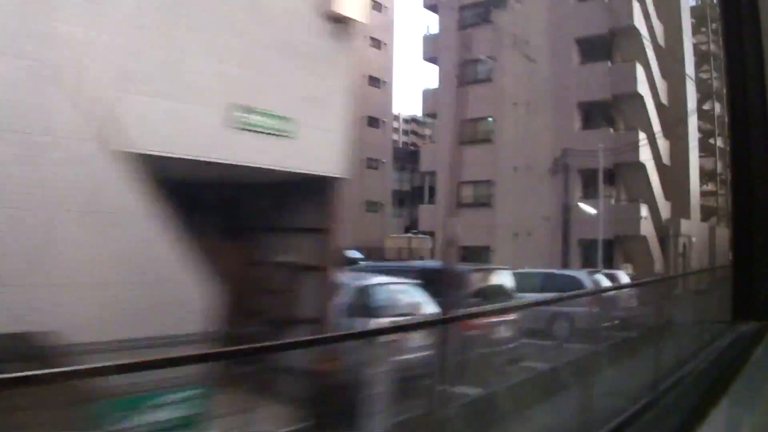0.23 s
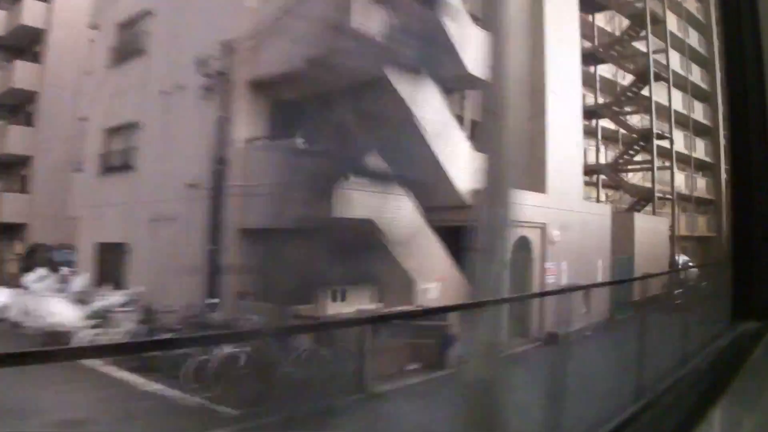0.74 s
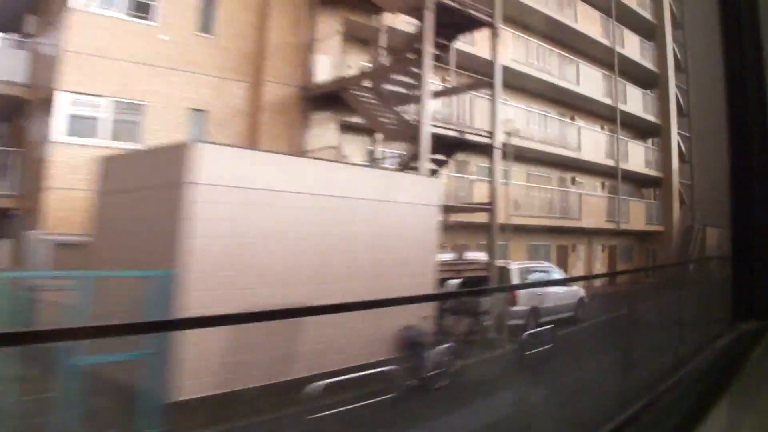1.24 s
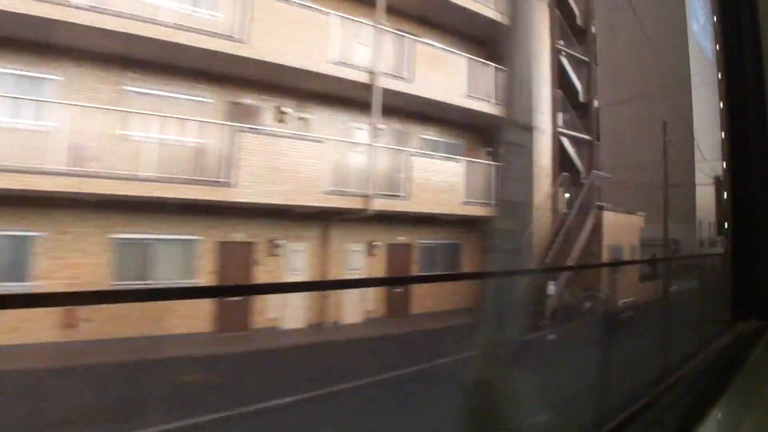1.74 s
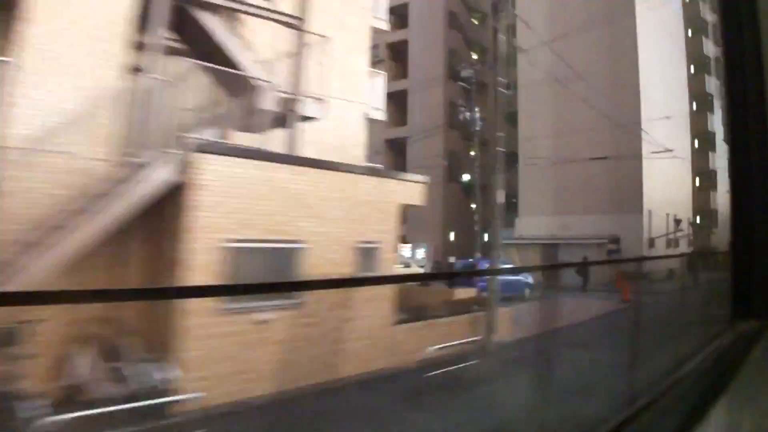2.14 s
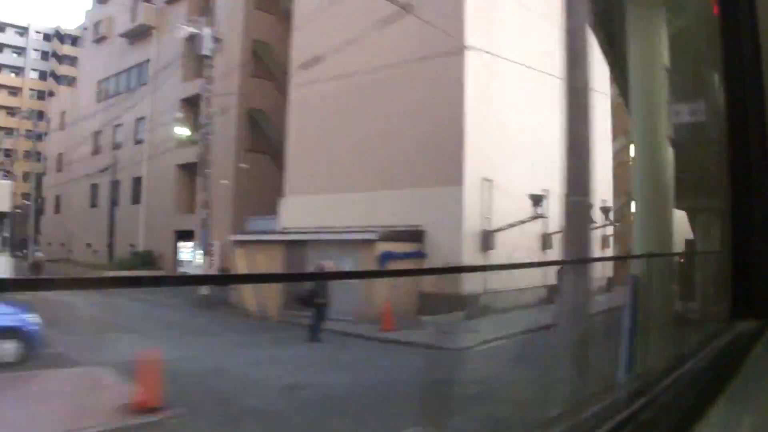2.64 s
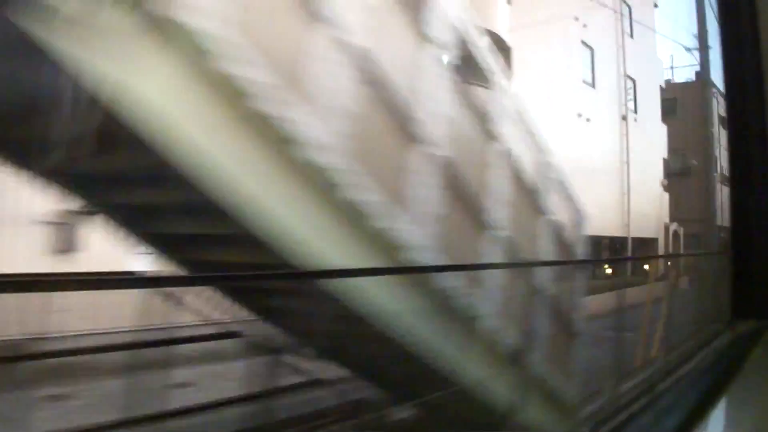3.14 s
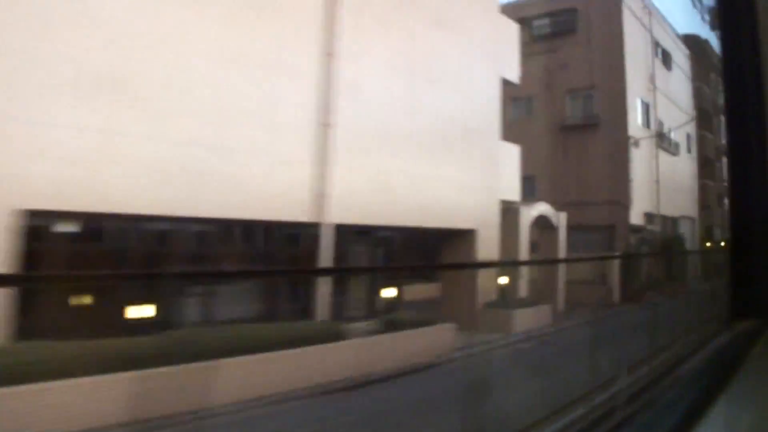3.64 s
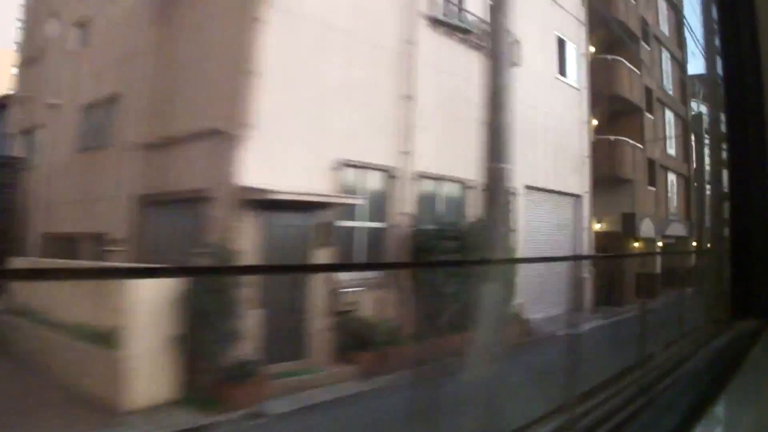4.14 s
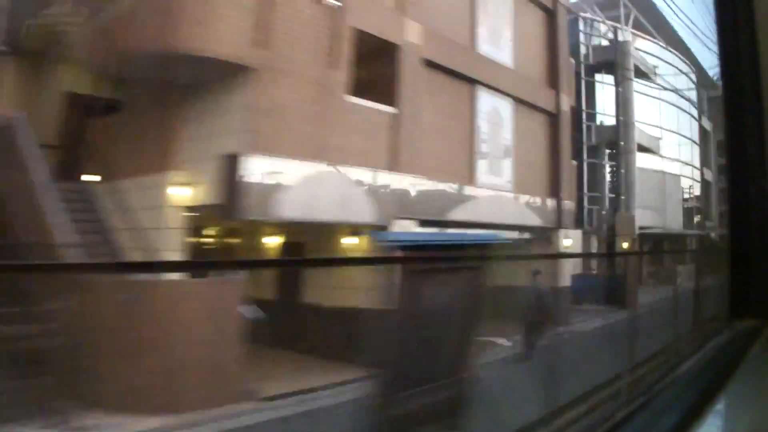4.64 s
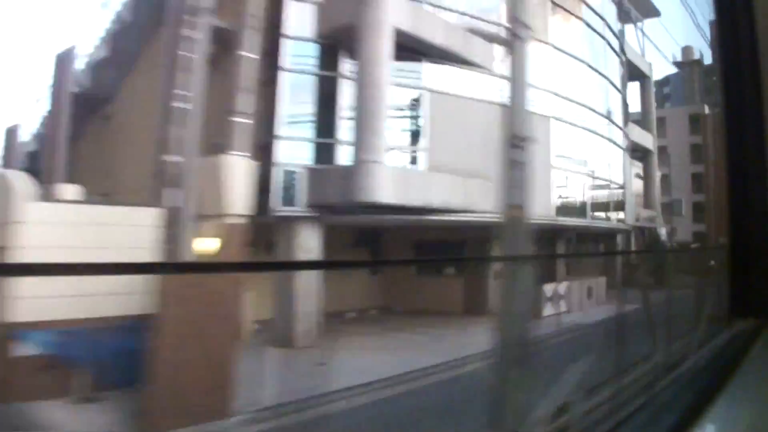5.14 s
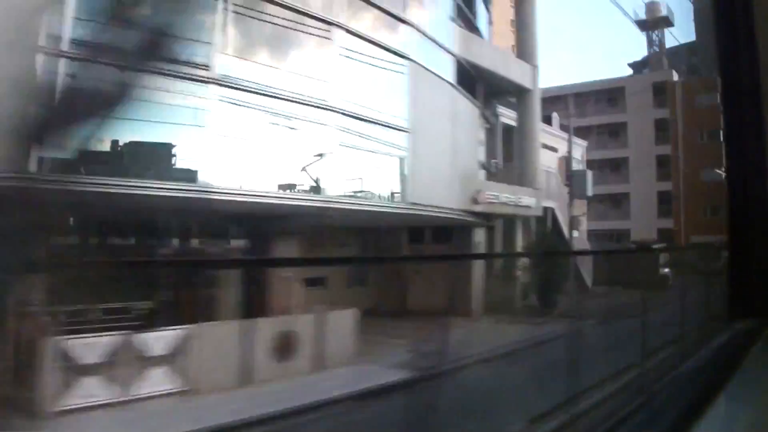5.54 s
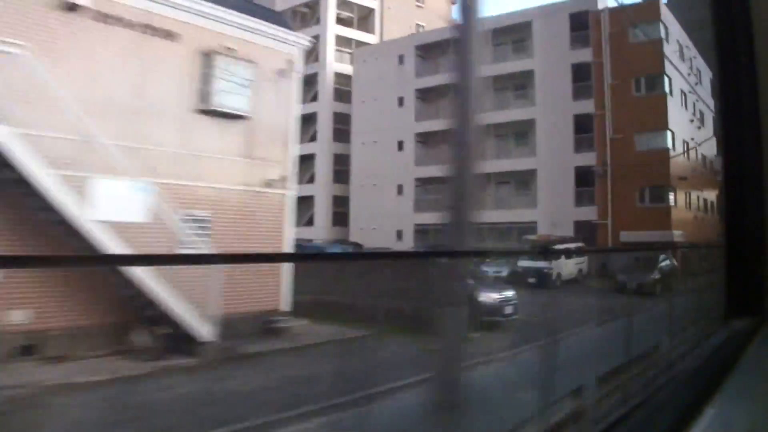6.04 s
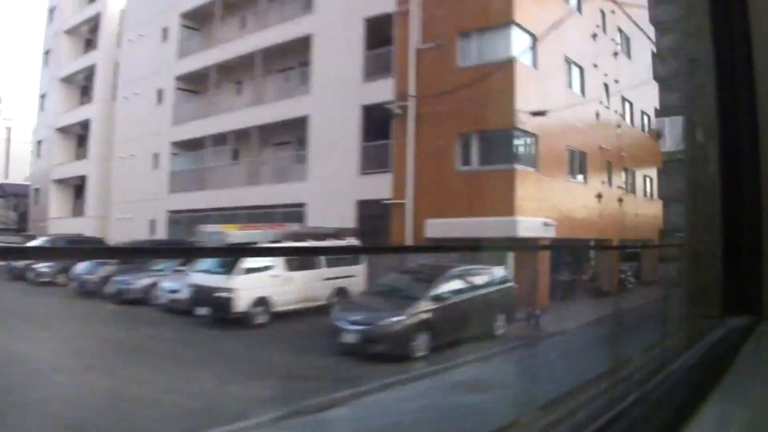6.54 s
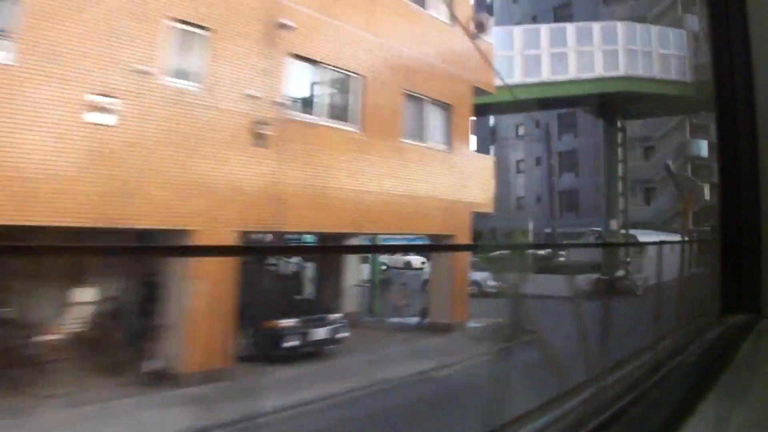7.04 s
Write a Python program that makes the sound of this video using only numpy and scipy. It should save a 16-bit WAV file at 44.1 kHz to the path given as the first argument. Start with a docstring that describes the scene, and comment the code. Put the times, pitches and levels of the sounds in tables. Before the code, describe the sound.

The inside of an electric train car running fast, heard close to a window. A deep, bassy rumble and body boom never stop, under a steady motor hum and a mid-low whine that swells, dips around 2.2 seconds, returns strongly near 3.4, and wavers again around 4.5. A light knock comes at the start, then mostly smooth rolling until thumps at 1.5 seconds and more at 2.3 and 2.8. A tight cluster of knocks with a short floor groan hits at 3.1 to 3.35, followed by sparser bumps at 4.0, 4.8 and 5.5. A panel drones in brief pulses. Faint cloth rustles and a sharp little click occur nearby around 5.8, with more ticks afterward. From 6 seconds the roar thickens, knocks crowd together, and the heaviest thud lands near 7.1, still rumbling as it ends at 7.3.

```python
"""A rumbling, booming electric train car with a motor whine, then knocks and groans as the track roughens.
Shaped noise makes the rolling, body modes, groans and wheel rings; sines on shaft orders make the motors.
Knocks are decaying pushes that ring floor modes, with a thump and a steel clack.
Nearby, bursts of filtered grains tick, cloth noise rustles and thin resonances squeak.
"""
import sys
import numpy as np
from scipy import signal
from scipy.fft import rfft, irfft
from scipy.io import wavfile
from scipy.ndimage import uniform_filter1d

SR = 44100
rng = np.random.default_rng(int(sys.argv[2]) if len(sys.argv) > 2 else 0)


def pcm_store(signal):
    """Save signal as 16-bit PCM."""
    levels = np.round(np.clip(np.atleast_2d(signal), -1, 1) * 32767)
    wavfile.write(sys.argv[1], SR, levels.astype(np.int16).T)


N = 321489
TIME = np.arange(N) / SR
FREQS = np.maximum(np.arange(N // 2 + 1) * SR / N, 1)

# Channel likeness: f/Hz, side minus mid/dB
WIDTH_POINTS = [(30, -7.5), (80, -7.5), (170, -6.3), (330, -6.3), (520, -10), (1200, -9), (2600, -5),
                (5000, -2), (10000, 1)]
# Channel balance: f/Hz, left minus right/dB
BALANCE_POINTS = [(30, -3), (60, -2.5), (95, -1), (210, -2), (490, 0), (1000, -1.5), (2600, 2), (5000, -1),
                  (10000, 1)]
# Cloth spectrum before tilt: f/Hz, relative density/dB
CLOTH_SPECTRUM = [(3000, -2), (4200, -7.5), (7000, -4), (9500, -2.5), (12500, -4.5), (15500, -13)]
# Cloth slides: mid t/s, length/s, peak level/dB, tilt/(dB per octave)
CLOTH_SLIDES = [(0.082, 0.092, -71, 0), (2.793, 0.34, -61, -10), (3.662, 0.16, -70.5, -3),
                (4.273, 0.96, -73, -1), (5.73, 0.22, -63.5, -3), (5.81, 0.16, -58.5, -6),
                (6.01, 0.29, -64.5, -8), (6.31, .1, -64, -6), (6.71, .16, -66, -7), (6.96, .07, -66, -3),
                (7.233, 0.31, -69.5, 2)]
# Trim squeaks: start t/s, length/s, peak level/dB, width/Hz, lower f/Hz, upper f/Hz
TRIM_SQUEAKS = [(1.864, .04, -68, 250, 9600, 11880), (4.687, 0.18, -73, 35, 8610, 15385),
                (4.856, 0.1, -67, 35, 8660, 15385), (7.142, 0.14, -69.5, 600, 8900, 9700)]
# Ticks and scrapes: t/s, level/dB, centre f/Hz, relative width, rise/s, t60/s, left minus right/dB
TICK_EVENTS = [(1.1205, -51, 11000, .6, 0.00065, .011, 5), (1.847, -60, 10000, .8, .0005, .022, 9),
               (1.920, -68, 10500, .5, .0005, .03, 6), (2.291, -61, 11000, .6, .0005, .02, 4),
               (4.953, -56, 4700, 1.1, .002, .099, -4), (5.803, -40, 1500, .6, .002, .035, 4),
               (5.8035, -40, 4600, 0.18, 0.0011, .016, -5), (5.8035, -50, 7950, 1.1, .002, .045, -1),
               (5.849, -58.5, 8500, 1.2, 0.0045, .06, -8), (5.9962, -50.5, 6100, 0.92, .002, .035, -10),
               (6.047, -64, 11000, .6, 0.0017, .04, -2), (6.3245, -49, 8000, 1.5, .004, .11, 1),
               (6.532, -53.5, 4700, .8, .001, .065, -6), (6.650, -53, 4800, 0.74, .001, .06, -3),
               (6.701, -50, 9500, 1.2, .0008, .015, 6), (6.705, -53.5, 7000, 1.5, .003, .1, 0),
               (6.716, -58, 5800, 1.3, 0.0045, .11, -1), (6.755, -59, 4800, 0.83, .003, .06, -2),
               (7.097, -50, 7500, 1.4, .001, .045, 4), (7.1092, -52, 7500, 1.4, .0006, .025, 4)]
# Wheel rings: start t/s, length/s, peak level/dB, f/Hz, width/Hz
WHEEL_RINGS = [(0.33, 0.6, -73, 3745, 20), (1.25, .4, -74, 3740, 18), (2.29, 0.18, -49, 1056, 90),
               (6.43, 0.18, -48, 1180, 91), (6.79, 0.12, -48, 1500, 700), (6.89, 0.14, -47.5, 1130, 88)]
# Auxiliary machines: f/Hz, level/dB, rms pitch wander/Hz
AUXILIARY_LINES = [(58.66, -37.5, 0.36), (1277, -61, 4), (3700, -79, 12), (11170, -92, 12)]
# Motor hum: shaft order, level/dB
HUM_ORDERS = [(1, -35), (2, -39), (4, -43), (5, -49), (8, -55), (9, -65.5)]
# Traction motor whine: t/s, level/dB
WHINE_LEVELS = [(0, -40.5), (.45, -38.7), (.8, -40), (1.18, -39.5), (1.38, -43.5), (1.6, -41), (1.72, -44),
                (2.15, -57), (2.5, -50), (2.8, -40.5), (3.4, -37), (3.9, -39.5), (4.1, -45), (4.35, -50.5),
                (4.58, -42.5), (4.72, -54.5), (5.2, -42), (6.1, -42), (7.29, -40.5)]
# Wall panel drone: t/s, level before PANEL_DB/dB
PANEL_LEVELS = [(1.1, -39.5), (1.54, -24.5), (1.67, -35.5), (1.83, -23.5), (2.03, -34), (2.5, -32.5),
                (2.72, -26.5), (2.95, -42), (3.17, -30.5), (3.95, -38), (4.28, -26), (4.44, -47.5),
                (4.95, -29.5), (5.2, -47), (5.45, -25), (5.6, -46), (5.79, -25), (6.0, -37), (6.6, -27.5),
                (6.95, -39), (7.29, -30)]
# Rough rail patches: mid t/s, length/s, peak level/dB, f/Hz, width/Hz
RAIL_PATCHES = [(3.18, 0.13, -24, 160, 130), (3.162, .2, -29.5, 285, 90), (3.348, 0.078, -29.5, 160, 110),
                (3.992, 0.22, -37, 392, 80), (4.775, 0.13, -36.5, 450, 397), (6.3, 0.62, -30.5, 317, 200),
                (6.288, .13, -24.5, 138, 70), (6.715, 0.074, -28.5, 420, 70), (6.857, 0.11, -35, 620, 240),
                (7.119, 0.083, -20, 297, 70.4), (7.153, 0.17, -36, 640, 227)]
# Wheels over joints: t/s, level before ring_db and thump_db/dB, thump f/Hz, clack level/dB
JOINT_KNOCKS = [(0.072, -26.5, 407, -48), (1.541, -23.5, 171, -46), (1.602, -23.5, 160, -56),
                (2.29, -23.5, 304, -47), (2.344, -18.5, 174, -61), (2.471, -28, 326, -65),
                (2.809, -22, 259, -51), (3.129, -18.5, 285, -47), (3.16, -19.5, 152, -47),
                (3.206, -20.5, 155, -47), (3.244, -23.5, 207, -54), (3.344, -21.5, 280, -55),
                (3.984, -27.5, 292, -51), (4.772, -25.5, 300, -52), (4.825, -23, 187, -54),
                (5.486, -25.5, 390, -41), (5.558, -27, 425, -45), (6.05, -20.5, 395, -50),
                (6.119, -25, 292, -49), (6.284, -26, 243, -50), (6.387, -22, 532, -42),
                (6.535, -19, 267, -51), (6.757, -21, 237, -57), (6.829, -20.5, 310, -46),
                (6.9, -22.5, 410, -52), (7.097, -10.5, 304, -43), (7.132, -17, 290, -54),
                (7.167, -24.5, 484, -53)]
# Floor modes rung by a knock: f/Hz, relative level/dB, t60/s
FLOOR_MODES = [(71.3, 1, 0.38), (153.3, 1, 0.41), (202, -1, 0.41), (237.3, 4, 0.45), (288.6, 12, 0.13),
               (338.7, 8, 0.38), (414, 7.5, 0.23), (447, 13, 0.12), (559, 5, 0.13), (615, 5, .1),
               (674, 0, 0.18)]
# Steel clack spectrum through the floor: f/Hz, relative density/dB
CLACK_SPECTRUM = [(650, 9.5), (950, 2), (1500, 0.5), (2100, -6), (3200, -18)]
# Track state: t/s, bogie shake/dB, rail roughness/dB
TRACK_STATE = [(0, -25.5, -27.5), (.45, -22, -29.5), (1.08, -27.5, -29.5), (1.6, -23, -29),
               (2.15, -25.5, -28), (2.6, -23, -28.5), (2.87, -20.5, -27.5), (3.0, -27.5, -27.5),
               (3.2, -21, -27), (3.551, -23.5, -29), (3.901, -27, -29.5), (4.7, -22.5, -28.5),
               (5.3, -27, -29), (5.55, -22, -25.5), (5.98, -18.5, -27.5), (6.12, -18.5, -23),
               (6.58, -14, -23), (7.0, -17.5, -22.5), (7.15, -17, -18.5), (7.29, -14, -21)]
# Smooth-track references: bogie shake/dB, rail roughness/dB
SMOOTH_TRACK_DB = (-23, -28)
# Bogie shake spectrum: f/Hz, relative density/dB
SHAKE_SPECTRUM = [(14, 3.5), (27, 1.5), (38, -2), (50, -5.5), (66, -3.5), (80, -3.5), (98, -9),
                  (130, -14.5)]
# Rolling roar spectrum: f/Hz, relative density/dB
ROAR_SPECTRUM = [(150, -6.5), (205, 2), (245, -2.5), (275, -2), (305, 0), (355, -5), (405, -2.2), (515, -9),
                 (625, -13), (780, -19), (1000, -31)]
# Gear noise spectrum: f/Hz, relative density/dB
GEAR_SPECTRUM = [(100, -1), (135, 0), (157, -1.5), (180, -5), (210, -5.5)]
# Wheel hiss spectrum: f/Hz, relative density/dB
HISS_SPECTRUM = [(700, 6), (950, 1), (1080, 1.5), (1180, -1.5), (1350, -0.5), (2000, -5), (2450, -13.5),
                 (2800, -13.5), (3500, -20), (5200, -27.5), (7500, -35.5), (10000, -37), (15500, -44.5)]

LOW_CUT_HZ, TOP_HZ, CEILING = 12, 15750, 0.84
CLOTH_PIVOT_HZ = 7000
STIR_DB, STIR_FOLLOWS, STIR_TILT_DB_PER_OCTAVE = -78.5, 0.95, -4.5
SHAFT_HZ, SLOWING_HZ_PER_S, WHINE_ORDER = 77.78, 0.095, 7
FAR_MOTORS_DB, FAR_MOTORS_WIDTH_HZ = -53, 22
BOOM_DB, PANEL_DB = -30, -2
# Shake, roar and boom levels hold on smooth track
SHAKE_DB, ROAR_DB, GEARS_DB, HISS_DB = -24, -33.5, -31, -44.5


def undb(db):
    """Decibels to gain."""
    return 10 ** (np.asarray(db) / 20)


def unit(x):
    """Scale the mid signal to a standard deviation of 1."""
    return x / np.std(np.atleast_2d(x).mean(axis=0))


def curves(table):
    """Interpolate the columns of a time table at every sample."""
    t_s, *columns = np.transpose(table)
    return [np.interp(TIME, t_s, column) for column in columns]


def colour(points):
    """Gain at every frequency from (f/Hz, level/dB) points."""
    hz, db = np.transpose(points)
    return undb(np.interp(np.log(FREQS), np.log(hz), db))


def spectrum(points, slope_db=24):
    """A colour that falls by slope_db an octave beyond its ends."""
    outside_octaves = np.abs(np.log2(FREQS / np.clip(FREQS, points[0][0], points[-1][0])))
    return colour(points) * undb(-slope_db * outside_octaves)


def resonance(hz, width_hz):
    """Response of one damped mode, 1 at its centre."""
    return 1 / (1 + 1j * (FREQS ** 2 - hz ** 2) / (FREQS * width_hz))


def pan(db):
    """Left and right gains for a left-minus-right level in dB."""
    return undb(np.array([[db], [-db]]) / 2)


def swell(start_s, length_s):
    """Half-sine rise and fall between 0 and 1."""
    return np.sin(np.pi * np.clip((TIME - start_s) / length_s, 0, 1))


def walk(rate_hz):
    """Random levels held for 1 / rate_hz and smoothed twice; standard deviation 1."""
    hold = int(SR / rate_hz)
    held = rng.standard_normal(4096)[np.arange(N) // hold]
    return unit(uniform_filter1d(uniform_filter1d(held, hold), hold))


def cabin_noise(gain):
    """Coloured noise with frequency-dependent channel likeness and balance."""
    mid, side = rfft(rng.standard_normal((2, N))) * (FREQS > LOW_CUT_HZ)
    side = side * colour(WIDTH_POINTS)
    balance = np.sqrt(colour(BALANCE_POINTS))
    left, right = (mid + side) * balance, (mid - side) / balance
    return unit(irfft(gain * np.array([left, right]), N))


def even(x, seconds):
    """Remove slow chance swells from a noise, keeping its fast flutter."""
    mid_power = uniform_filter1d(x.mean(axis=0) ** 2, int(seconds * SR))
    return x / np.sqrt(mid_power)


def tone(hz, waver_db, drift_hz):
    """A unit-level sine that wavers in level and pitch."""
    phase = 2 * np.pi * np.cumsum(hz + drift_hz * walk(9)) / SR
    return unit(np.sin(phase) * undb(waver_db * walk(8.0)))


def roughness():
    """Bogie shake and rail roughness relative to smooth track, in dB."""
    return [db - smooth_db for db, smooth_db in zip(curves(TRACK_STATE), SMOOTH_TRACK_DB)]


def cloth(tilt_db_per_octave):
    """Cloth friction noise, its spectrum tilted about the pivot frequency."""
    tilt = undb(tilt_db_per_octave * np.log2(FREQS / CLOTH_PIVOT_HZ))
    return cabin_noise(spectrum(CLOTH_SPECTRUM) * tilt)


def rustle():
    """Cloth slides in many little slips over a faint stirring that follows the bogie shake."""
    out = cloth(STIR_TILT_DB_PER_OCTAVE) * undb(STIR_DB + STIR_FOLLOWS * roughness()[0])
    for mid_s, length_s, db, tilt_db in CLOTH_SLIDES:
        out = out + cloth(tilt_db) * swell(mid_s - length_s / 2, length_s) * undb(db)
    slips = undb(1.5 * walk(220))
    return out * slips / np.sqrt(np.mean(slips ** 2)) * pan(-1)


def squeak():
    """Rubbing trim excites a thin, scratchy pair of resonances."""
    out = 0
    for start_s, length_s, db, width_hz, *partials_hz in TRIM_SQUEAKS:
        pair = cabin_noise(sum(resonance(hz, width_hz) ** 2 for hz in partials_hz))
        out = out + pair * swell(start_s, length_s) * undb(db)
    return out


def ticks(grit_db=4.0, grain_s=0.0002, glass_s=0.000978, glass_db=-12):
    """Grains in one band rise briefly and die fast; the window pane returns a delayed copy."""
    out = np.zeros((2, N + SR))
    age = TIME[:SR // 4]
    for t_s, db, hz, width, rise_s, t60_s, pan_db in TICK_EVENTS:
        sizes = undb(grit_db * rng.standard_normal(len(age)))[(age / grain_s).astype(int)]
        grains = sizes * rng.standard_normal((2, len(age)))
        edges_hz = np.clip([hz / (1 + width / 2), hz * (1 + width / 2)], 500, 0.45 * SR)
        band = signal.butter(2, edges_hz, "band", fs=SR, output="sos")
        burst = unit(signal.sosfilt(band, grains))
        decay = undb(db - 60 * np.maximum(age - rise_s, 0) / t60_s)
        envelope = np.minimum(age / rise_s, 1) * decay
        start = int(t_s * SR)
        out[:, start:start + len(age)] += burst * envelope * pan(pan_db)
    reflection = undb(glass_db) * np.roll(out, int(glass_s * SR), axis=1)
    return (out + reflection)[:, :N]


def wheel_rings():
    """Rubbing on the rail swells one wheel mode for a moment."""
    out = 0
    for start_s, length_s, db, hz, width_hz in WHEEL_RINGS:
        ring = cabin_noise(resonance(hz, width_hz) ** 2)
        out = out + ring * swell(start_s, length_s) * undb(db)
    return out


def motors():
    """Shaft orders whine and hum as the shaft slows; auxiliaries wander about their own pitches."""
    shaft_hz = SHAFT_HZ - SLOWING_HZ_PER_S * TIME
    whine_hz = WHINE_ORDER * shaft_hz
    whine_db, = curves(WHINE_LEVELS)
    whine = tone(whine_hz, waver_db=1.2, drift_hz=0.3) * undb(whine_db) * pan(0.3)
    # other bogies, blurred by the car body
    far = cabin_noise(resonance(whine_hz.mean(), FAR_MOTORS_WIDTH_HZ) ** 2) * undb(FAR_MOTORS_DB)
    hum = sum(undb(db) * tone(round(order) * shaft_hz, waver_db=3.5, drift_hz=0.62)
              for order, db in HUM_ORDERS)
    auxiliary = sum(undb(db) * tone(hz, waver_db=3, drift_hz=wander_hz)
                    for hz, db, wander_hz in AUXILIARY_LINES)
    return whine + far + hum * pan(-1) + auxiliary * pan(-2)


def body_modes(boom_follows=0.59):
    """Two lightly damped modes: the body booms with the bogie shake and a wall panel drones."""
    boom = even(cabin_noise(resonance(59.53, 10.0) ** 2), 0.28)
    drone = even(cabin_noise(resonance(225.74, 6.9) ** 2), 0.11)
    boom_db = BOOM_DB + boom_follows * roughness()[0]
    drone_db = PANEL_DB + curves(PANEL_LEVELS)[0]
    return boom * undb(boom_db) + drone * undb(drone_db)


def rough_patches():
    """Each worn stretch of rail makes the floor groan briefly in a band of its own."""
    out = 0
    for mid_s, length_s, db, hz, width_hz in RAIL_PATCHES:
        groan = even(cabin_noise(resonance(hz, width_hz) ** 2), 0.058)
        out = out + groan * swell(mid_s - length_s / 2, length_s) * undb(db)
    return out


def knocks(contact_s=0.029, ring_db=-4, thump_db=2, thump_rise_s=0.0046, clack_s=0.025):
    """Each joint thumps the bogie at its own pitch, rings the floor by a ragged push and clacks the steel."""
    push, thump, clack = np.zeros((3, N))
    for t_s, db, hz, clack_db in JOINT_KNOCKS:
        age = np.maximum(TIME - t_s, 0)
        push += undb(db) * (age > 0) * np.exp(-age / contact_s)
        thump_envelope = age / thump_rise_s * np.exp(1 - age / thump_rise_s)
        thump += undb(db) * thump_envelope * np.sin(2 * np.pi * hz * age)
        clack += undb(clack_db) * (age > 0) * np.exp(-age / clack_s)
    # flooring soaks up the treble
    ragged = cabin_noise(spectrum([(60, 29.5), (700, 10.0), (1400, -9.5)]))
    force = push * even(ragged, 0.011)
    age = TIME[:SR // 2]
    ring = sum(undb(db - 60 * age / t60_s) * np.sin(2 * np.pi * hz * age)
               for hz, db, t60_s in FLOOR_MODES)
    thud = signal.fftconvolve(force, ring[None], axes=1)[:, :N]
    # match the overall level of the push
    thud = thud * np.std(force) / np.std(thud)
    steel = clack * cabin_noise(spectrum(CLACK_SPECTRUM))
    return undb(ring_db) * thud + undb(thump_db) * thump * pan(-2) + steel


def rolling(roar_follows=1.43, gears_follow=0.21, hiss_follows=0.24):
    """Uneven rail shakes the bogie and roars through the floor; gears and wheel hiss follow it weakly."""
    shake_db, rough_db = roughness()
    shake = even(cabin_noise(spectrum(SHAKE_SPECTRUM)), 0.22) * undb(SHAKE_DB + shake_db)
    roar_db = ROAR_DB + roar_follows * rough_db + 1.0 * walk(25)
    roar = even(cabin_noise(spectrum(ROAR_SPECTRUM)), 0.18) * undb(roar_db)
    gears_db = GEARS_DB + gears_follow * rough_db
    gears = even(cabin_noise(spectrum(GEAR_SPECTRUM)), 0.11) * undb(gears_db)
    hiss_db = HISS_DB + hiss_follows * (rough_db - rough_db.mean()) + 0.55 * walk(15)
    hiss = cabin_noise(spectrum(HISS_SPECTRUM)) * undb(hiss_db)
    return shake + roar + gears + hiss


def scene():
    """Sum of all sources as heard from a window seat."""
    nearby = rustle() + squeak() + ticks()
    train = wheel_rings() + motors() + body_modes() + rough_patches() + knocks() + rolling()
    return nearby + train


def record(dry):
    """A soft ceiling rounds the highest peaks; a steep low-pass cuts the top."""
    rounded = dry / (1 + (dry / CEILING) ** 6) ** (1 / 6)
    low_pass = signal.ellip(10, 0.1, 80, TOP_HZ, fs=SR, output="sos")
    return signal.sosfilt(low_pass, rounded)


dry = scene()
out = record(dry)
pcm_store(out)
```